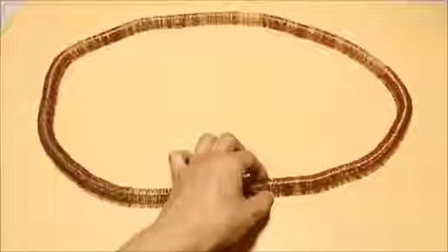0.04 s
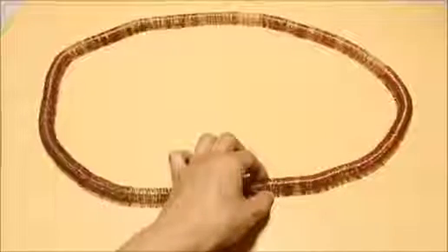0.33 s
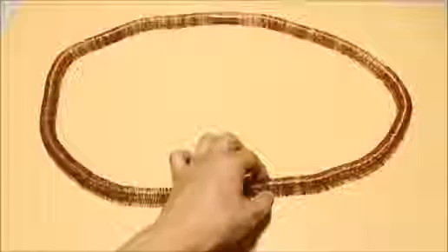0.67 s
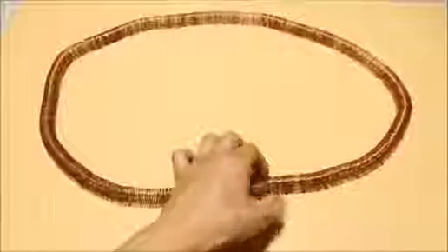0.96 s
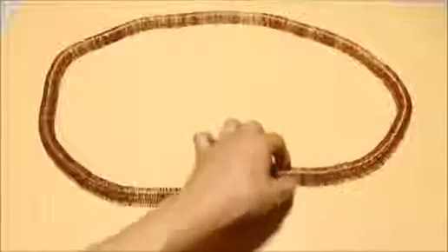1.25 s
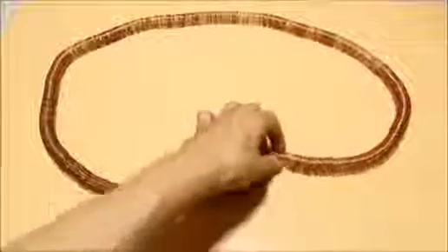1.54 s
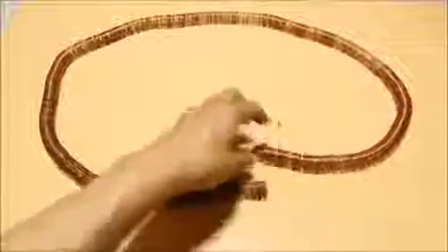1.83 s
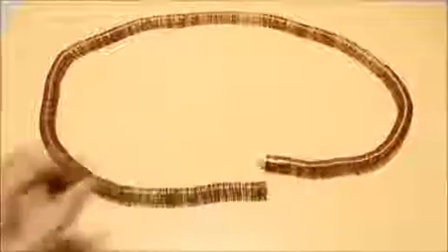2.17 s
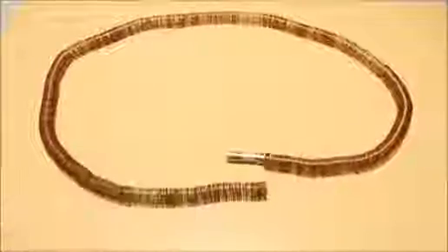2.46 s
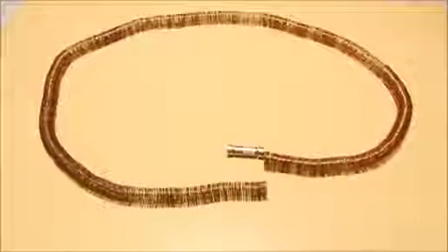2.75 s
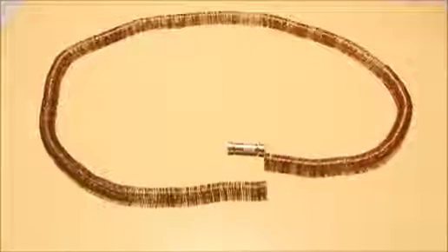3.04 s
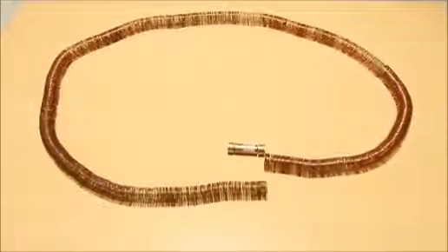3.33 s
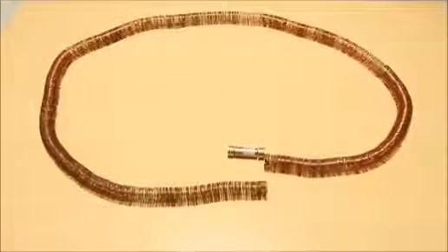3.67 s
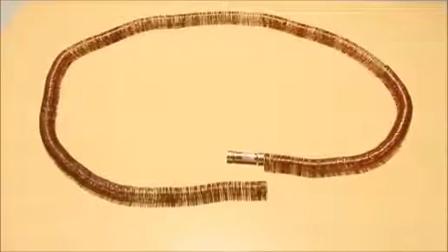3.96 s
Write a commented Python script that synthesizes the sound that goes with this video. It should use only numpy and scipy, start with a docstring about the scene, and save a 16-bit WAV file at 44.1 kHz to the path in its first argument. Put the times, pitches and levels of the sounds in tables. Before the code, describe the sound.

A battery with magnets scrapes through a copper coil on a table, the wire sizzling, ticking and ringing over a low rumble and dull taps. It knocks twice on the way out, leaving a quiet room.

```python
"""A battery slides through a copper coil

A battery with a magnet on each end is pushed into a bare copper coil on a table and slides through.
The magnets scrape over the turns: the wire sizzles, ticks and rings, and the table rumbles under it.
The battery knocks twice as it runs out of the far end, and a quiet room remains."""
import sys
import numpy as np
from scipy import signal
from scipy.fft import rfft, irfft
from scipy.io import wavfile
from scipy.ndimage import uniform_filter1d

SR = 44100
rng = np.random.default_rng(int(sys.argv[2]) if len(sys.argv) > 2 else 0)


def log_audio(samples):
    """Write samples as a 16-bit WAV file to the path given in sys.argv[1]."""
    # one column per channel
    frames = np.atleast_2d(samples).T
    # limit to full scale, then quantise
    limited = np.clip(frames, -1, 1)
    pcm = np.round(limited * 32767).astype(np.int16)
    wavfile.write(sys.argv[1], SR, pcm)


N = 176400
TIME = np.arange(N) / SR
EXIT_S, STOP_S = 2.452, 2.55  # the battery coasts out of the coil, then stops


def amp(db):
    """Turns decibels into a number to multiply by."""
    return 10 ** (np.asarray(db) / 20)


def unit(x):
    """Scales a signal to an average power of 1."""
    return x / np.sqrt(np.mean(x ** 2) + 1e-20)


def read(points, hz):
    """Reads between the rows of a table, on a scale of octaves."""
    f, value = np.transpose(points)
    return np.interp(np.log(hz + 1), np.log(f + 1), value)


def add(mix, s, sound):
    """Mixes a sound in, starting at s seconds."""
    part = mix[round(s * SR):][:len(sound)]
    part += sound[:len(part)]


def through(x, response):
    """Lets every sample of x set off the response, scaled to energy 1."""
    return signal.fftconvolve(x, response / np.linalg.norm(response))[:N]


def colour(x, points, size=8192):
    """Shapes the lows and highs by a tone table; only the gaps between its levels count."""
    log_gain = np.log(amp(read(points, abs(np.fft.fftfreq(size, 1 / SR)))))
    spectrum = np.exp(np.conj(signal.hilbert(log_gain)))  # nothing sounds before its hit
    return through(x, np.fft.ifft(spectrum).real[:size // 2])


def ring(x, modes):
    """A struck object rings with its own notes; each takes its ring time to fade by 60 dB."""
    t = TIME[:SR // 2]
    notes = sum(amp(db - 60 * t / ring_s) * np.sin(2 * np.pi * hz * t) for hz, db, ring_s in modes)
    return through(x, notes)


def wander(rate_hz):
    """A smooth random wobble."""
    hz = np.fft.rfftfreq(N, 1 / SR)
    noise = rfft(rng.standard_normal(N))
    return unit(irfft(noise * hz / (hz + rate_hz / 10) / (1 + (hz / rate_hz) ** 2), N))


def contacts(per_s, spread_db, clump_hz, clump_db):
    """Tiny hits of uneven size that come in quick clumps at a steady average power."""
    sizes = amp(spread_db * rng.random(N)) * rng.choice([-1, 1], N)
    hits = sizes * (rng.random(N) < per_s / SR)
    hits *= amp(clump_db * np.tanh(wander(clump_hz)))
    return hits / np.sqrt(abs(uniform_filter1d(hits ** 2, SR // 10)) + 1e-9)


def effort(curve, settle_db_per_s=309.5):
    """Follows a level curve and dies away once the battery has stopped."""
    return amp(np.interp(TIME, *np.transpose(curve)) - settle_db_per_s * np.maximum(TIME - STOP_S, 0))


def coasting(fade_db_per_s=123):
    """The level falls as the battery slows on leaving the coil."""
    return amp(-fade_db_per_s * np.maximum(TIME - EXIT_S, 0))


def blows(rows):
    """One sharp kick for each row."""
    out = np.zeros(N)
    for s, db in rows:
        add(out, s, amp([db]))
    return out


# how long the room and coil ring on: f/Hz, ring time/s
ECHO_TIMES = [(100, 0.47), (260, 0.2), (700, 0.28), (2000, 0.3), (4800, 0.25), (12000, 0.18)]
def echo(size=256):
    """A wash of reflections, each pitch dying at its own speed."""
    hz, t, bands = signal.stft(rng.standard_normal(SR // 3), SR, nperseg=size)
    out = signal.istft(bands * amp(-60 * t / read(ECHO_TIMES, hz)[:, None]), SR, nperseg=size)[1]
    out[:SR // 250] = 0  # the first reflection takes 4 ms
    return out / np.linalg.norm(out)


def room(x, echo_db, stretches=1):
    """A sound plus its echo; a moving source meets a new echo on each stretch of its way."""
    wet, hop = np.zeros(N), N // stretches
    if stretches == 1:
        wet = through(x, echo())
    else:
        for centre in range(0, N, hop):
            at = np.arange(max(centre - hop, 0), min(centre + hop, N))
            piece = x[at] * np.cos(np.pi / 2 * (at - centre) / hop)
            add(wet, at[0] / SR, signal.fftconvolve(piece, echo()))
    return (x + amp(echo_db) * wet) / np.hypot(1, amp(echo_db))


# tone of the quiet room: f/Hz, level/dB
QUIET_TONE = [(20, -11), (60, 1), (210, -9), (400, -20.5), (600, -17), (1000, -28.5), (1370, -19.5),
              (1750, -32), (2600, -31), (3700, -22), (15000, -29.5)]
def quiet_room(level_db=-55):
    """Low room rumble and microphone hiss."""
    tone = amp(read(QUIET_TONE, np.fft.rfftfreq(N, 1 / SR)))
    return amp(level_db) * unit(irfft(rfft(rng.standard_normal(N)) * tone, N))


# how hard the magnets scrape: t/s, level/dB
SCRAPING = [(0.0, -42), (0.27, -32.5), (0.32, -27), (0.41, -33), (0.5, -33.5), (0.55, -31), (0.575, -23.5),
            (0.66, -25.5), (0.72, -34), (0.78, -30.5), (0.93, -29.5), (0.99, -24.5), (1.1, -28.5),
            (1.53, -30.5), (1.62, -40), (1.69, -33), (2.08, -34), (2.2, -30), (2.36, -33.5), (2.39, -28),
            (2.41, -35), (2.56, -66)]
# tone of the scraping: f/Hz, level/dB
SIZZLE_TONE = [(1200, -33), (2800, -5), (4500, -0.5), (6600, 2), (9800, -2.5), (11700, -8.5),
               (15500, -13.5)]
def sizzle():
    """The magnets' edges scrape over bare wire."""
    scrape = contacts(per_s=2400, spread_db=14, clump_hz=70, clump_db=4.5) * effort(SCRAPING)
    return amp(-0.9) * room(colour(scrape, SIZZLE_TONE), echo_db=-2.5, stretches=14)


def pings(low_hz=5600, high_hz=10800, spread_db=13, count=520, ring_s=.014):
    """The passing magnets pluck single turns, each with its own short metallic ping."""
    out, t, level = np.zeros(N), TIME[:SR // 20], effort(SCRAPING)
    for when, pitch, softness in rng.random((count, 3)):
        s, hz = when * EXIT_S, low_hz * (high_hz / low_hz) ** pitch
        fade = amp(-spread_db * softness - 60 * t / ring_s)
        add(out, s, level[round(s * SR)] * fade * np.sin(2 * np.pi * hz * t))
    return amp(9.3) * room(out, echo_db=0)


# how hard the coil shakes: t/s, level/dB
SHAKING = [(0.0, -37.5), (0.33, -35.5), (0.49, -39.5), (0.58, -35), (1.02, -33.5), (1.24, -37.5),
           (1.31, -32.5), (1.66, -38.5), (2.4, -33)]
# tone of the jostling turns: f/Hz, level/dB
WIRE_TONE = [(500, -21.5), (1250, -11), (1900, -3), (3000, -3), (6000, -7), (12000, -37)]
# the coil's own notes: f/Hz, level/dB, ring time/s
COIL_NOTES = [(1687, -6, .2), (1787, 0, .22), (1957, -4, .25), (2141, -3, .25), (2283, -2, .22),
              (2838, -4, .13), (3498, -7, .14), (4657, -5, .12)]
def coil():
    """The turns jostle each other and ring."""
    level = effort(SHAKING) * coasting()
    jostle, strike = (contacts(per_s=2500, spread_db=13.5, clump_hz=62.4, clump_db=2) for _ in range(2))
    jangle = room(colour(jostle * level, WIRE_TONE), echo_db=-2.5, stretches=8)
    return jangle + amp(-17) * ring(strike * level, COIL_NOTES)


# how hard the weight drags over the table: t/s, level/dB
DRAGGING = [(0.07, -43), (0.11, -34.5), (0.4, -40.5), (0.8, -39.5), (0.85, -31.5), (0.92, -40),
            (1.38, -38.5), (1.62, -38.5), (2.3, -41), (2.42, -35.5)]
# tone of the rumbling table: f/Hz, level/dB
RUMBLE_TONE = [(25, -26), (70, -7.5), (140, -5.5), (270, -1.5), (430, -15), (1200, -31)]
# two hollow table notes: f/Hz, level/dB, ring time/s, strongest at t/s, reach either side/s
HOLLOW_NOTES = [(290.3, -6.5, 0.31, 0.71, 0.44), (233, -1.5, 0.2, 2.09, 0.46)]
def rumble():
    """The bumpy ride shakes the table; one hollow note gives way to a lower one along the way."""
    level = effort(DRAGGING) * coasting()
    bumps, strike = (contacts(per_s=500, spread_db=7.5, clump_hz=44.4, clump_db=1) for _ in range(2))
    hollow = np.zeros(N)
    for hz, db, ring_s, s, reach in HOLLOW_NOTES:
        swell = amp(db) * np.exp(-((TIME - s) / reach) ** 2)
        hollow += ring(strike * level * swell, [(hz, 0, ring_s)])
    return room(amp(-1.5) * colour(bumps * level, RUMBLE_TONE), echo_db=-1.5, stretches=8) + hollow


# how hard the coil bounces on the table: t/s, level/dB
BOUNCING = [(0.08, -38), (0.11, -34), (0.55, -40), (0.69, -52), (0.86, -36.5), (0.99, -55.5), (1.34, -33.5),
            (1.52, -38.5), (1.62, -45), (1.86, -42), (1.94, -38.5), (2.17, -44.5), (2.46, -30.5),
            (2.56, -43)]
# single harder taps: t/s, level/dB
TAP_HITS = [(0.503, -24), (1.049, -25), (1.127, -22), (1.152, -29.5), (1.203, -25.5), (1.245, -25),
            (1.292, -20), (1.368, -30), (1.39, -27), (1.415, -20.5), (1.492, -27.5), (1.536, -23.5),
            (1.891, -28)]
# tone of a tap: f/Hz, level/dB
TAP_TONE = [(100, -37), (330, -1.5), (520, -1.5), (920, -0.5), (1200, -22), (2500, -6), (9000, -40)]
# the table's own notes: f/Hz, level/dB, ring time/s
TABLE_NOTES = [(226, -1, .2), (290, -2, .15), (478, -5, .15), (502, -1, .2), (700, -8, .16), (868, -8, .17),
               (906, -10, .15)]
def taps(dull_above_hz=580):
    """The coil patters dully on the table in spells, with single harder taps."""
    patter = contacts(per_s=300, spread_db=4, clump_hz=40, clump_db=3) * effort(BOUNCING)
    dull_patter = signal.lfilter(*signal.butter(2, dull_above_hz, fs=SR), patter)
    hits = amp(17.5) * blows(TAP_HITS) + dull_patter
    return room(colour(hits, TAP_TONE), echo_db=2, stretches=8) + amp(-2) * ring(hits, TABLE_NOTES)


# bumps of the battery: t/s, level/dB
THUMP_HITS = [(.108, -8), (.17, -7), (.268, -7), (.832, -9), (.856, -7.5)]
# tone of its thud on the table: f/Hz, level/dB
THUD_TONE = [(80, -6.5), (240, 8), (400, 2), (490, 2.5), (700, -25), (4000, -55)]
def thumps():
    """The battery's weight bumps the table."""
    return room(colour(blows(THUMP_HITS), THUD_TONE), echo_db=-4)


# snaps of the wire: t/s, level/dB
TICK_HITS = [(0.116, -22), (0.2254, -17), (0.2997, -12), (0.307, -13), (0.3225, -9), (0.5117, -15),
             (0.516, -14), (0.673, -14), (0.9617, -13), (1.175, -14), (1.6876, -18)]
# tone of a snap: f/Hz, level/dB
TICK_TONE = [(1000, -45), (6500, -15), (9500, -14), (13500, -42)]
def ticks():
    """A magnet snaps over a turn of wire with a sharp tick."""
    return amp(11) * room(colour(blows(TICK_HITS), TICK_TONE), echo_db=3)


# rubs that make the wire sing: t/s, f/Hz, level/dB, fade/(dB per s)
RUBS = [(.83, 1795, -36, 45), (.93, 6400, -33, 28), (1.285, 2900, -30, 170)]
def singing_wire(ring_cycles=130):
    """Rubbing keeps one note of a stretch of wire going, then fades."""
    out, t = np.zeros(N), TIME[:SR // 2]
    for s, hz, db, fade in RUBS:
        note = amp(-60 * t * hz / ring_cycles) * np.sin(2 * np.pi * hz * t)
        rub = rng.standard_normal(len(t)) * amp(db - fade * t)
        add(out, s, through(rub, note))
    return out


# knocks at the far end: t/s, click level/dB, thud level/dB, rattle level/dB
KNOCK_HITS = [(2.4163, -1, -4.5, -2.5), (2.573, -5.5, -1.5, -2)]
# tone of knocked metal: f/Hz, level/dB
METAL_TONE = [(150, -17), (235, -7), (450, -10), (1150, -16), (1800, -3), (2900, -8), (3600, -3),
              (4700, -19.5), (7500, -23.5), (14000, -72)]
def knocks(thud_delay_s=.003, rattle_s=.06, bounces_per_s=1500, rattle_fall_db=20):
    """The magnet clicks on the wire, the battery thuds onto the table and rattles to rest."""
    hit, thud, rattle = np.zeros((3, N))
    t = TIME[:round(rattle_s * SR)]
    for s, click_db, thud_db, rattle_db in KNOCK_HITS:
        add(hit, s, amp([click_db]))
        add(thud, s + thud_delay_s, amp([thud_db]))
        bounces = rng.choice([-1, 1], len(t)) * (rng.random(len(t)) < bounces_per_s / SR)
        dying = bounces * amp(-rattle_fall_db * t / rattle_s)
        add(rattle, s + thud_delay_s, amp(rattle_db) * dying / np.linalg.norm(dying))
    on_table = thud + rattle / 2
    metal = room(colour(amp(-10) * hit + amp(7) * rattle, METAL_TONE), echo_db=0)
    ringing = amp(-4) * ring(hit + rattle, COIL_NOTES) + amp(-1.5) * ring(on_table, TABLE_NOTES)
    wood = amp(1) * room(colour(on_table, THUD_TONE), echo_db=-3)
    click = amp(-10) * room(colour(hit + thud, TICK_TONE), echo_db=-7)
    return metal + ringing + wood + click


def scene():
    """Everything reaches one microphone, heard in both ears."""
    sliding = sizzle() + pings() + coil() + singing_wire() + rumble()
    mono = sliding + ticks() + taps() + thumps() + knocks() + quiet_room()
    return np.array([mono, mono])


def record(dry):
    """Cuts off the very highest treble, above 15450 Hz."""
    treble_cut = signal.firwin(511, 15450, window=("kaiser", 9), fs=SR)
    return signal.oaconvolve(dry, treble_cut[None], "same")


dry = scene()
out = record(dry)
log_audio(out)
```